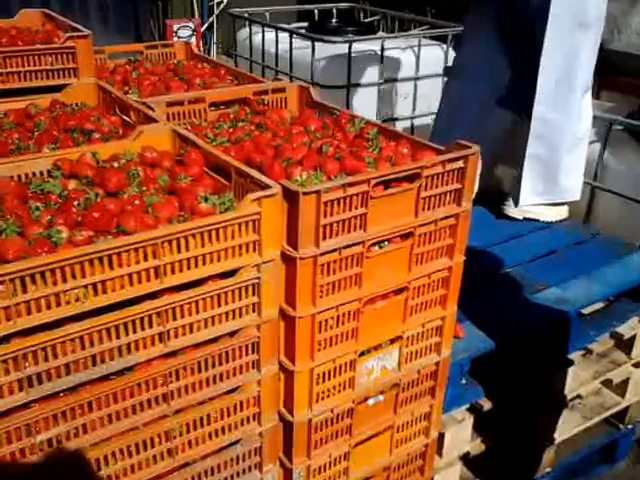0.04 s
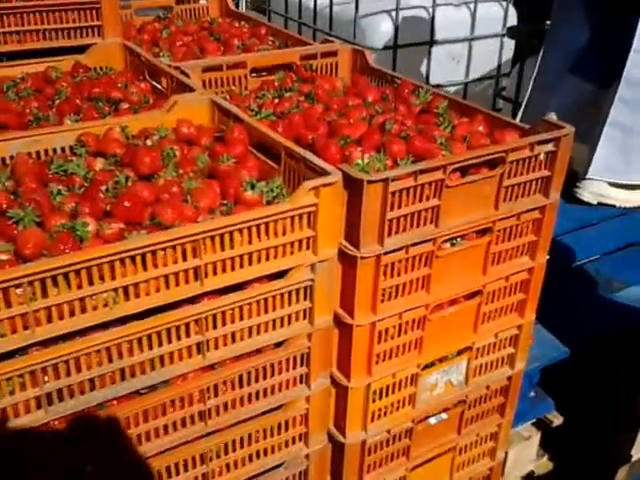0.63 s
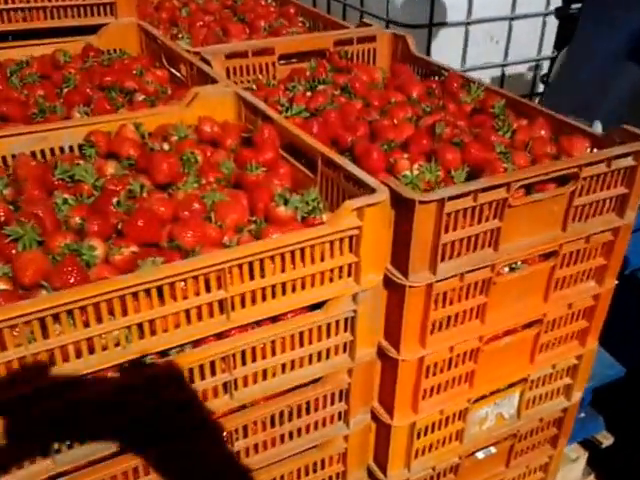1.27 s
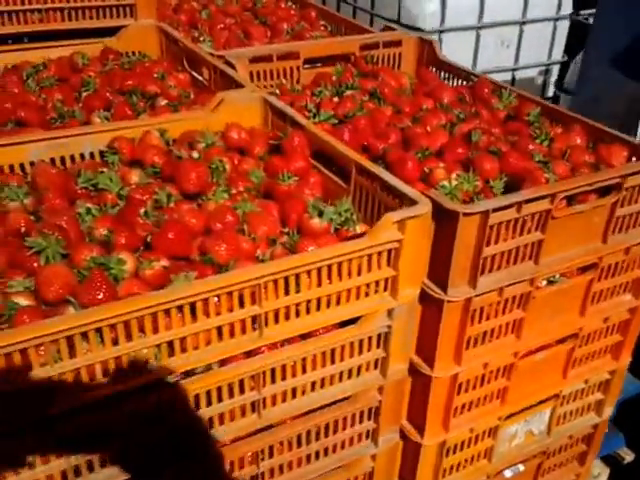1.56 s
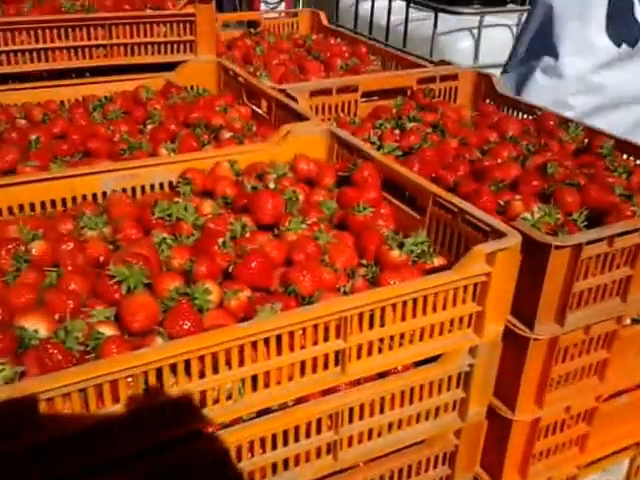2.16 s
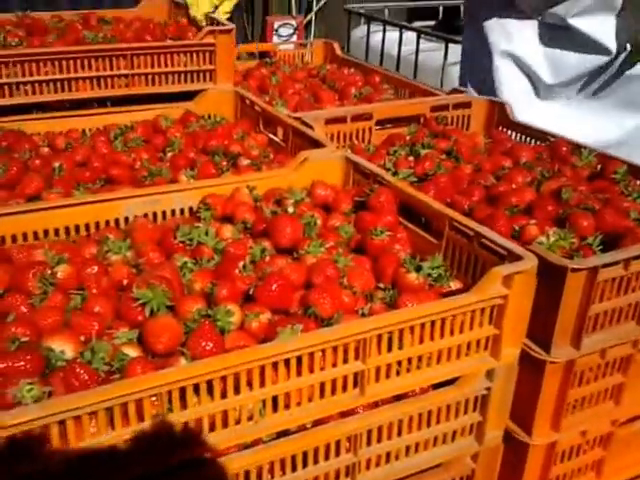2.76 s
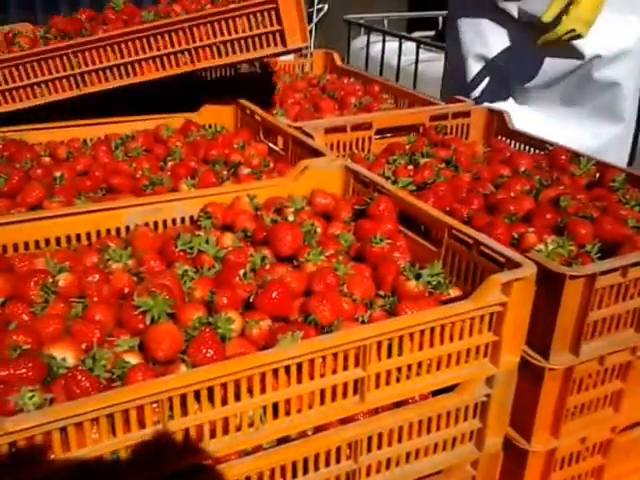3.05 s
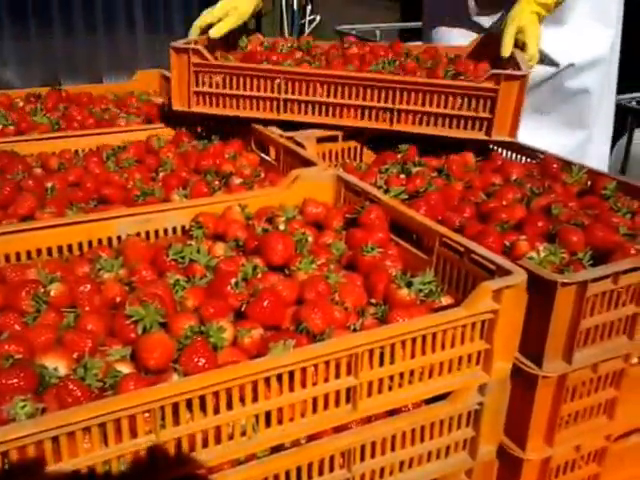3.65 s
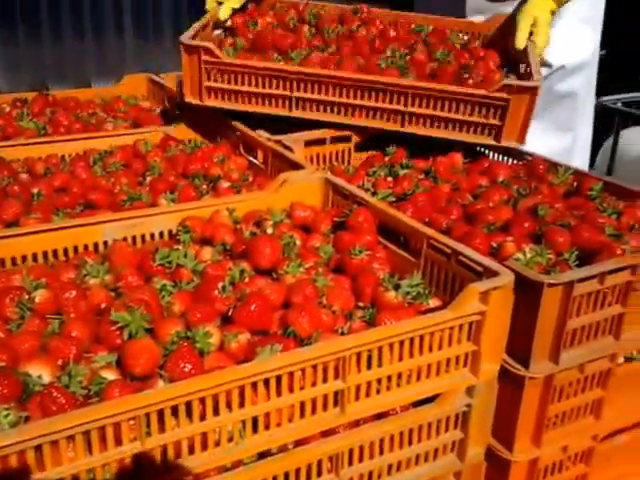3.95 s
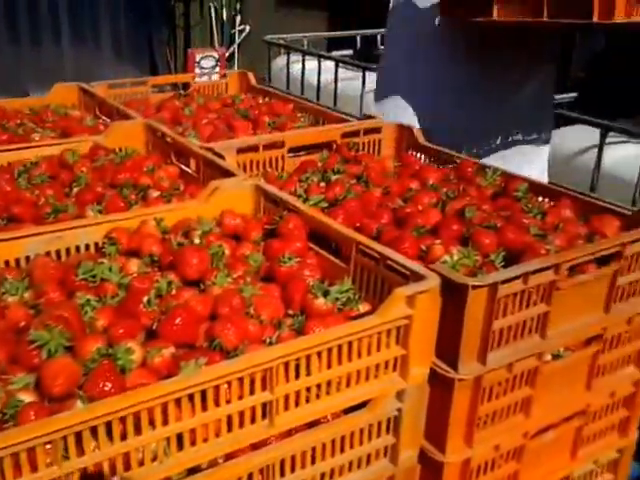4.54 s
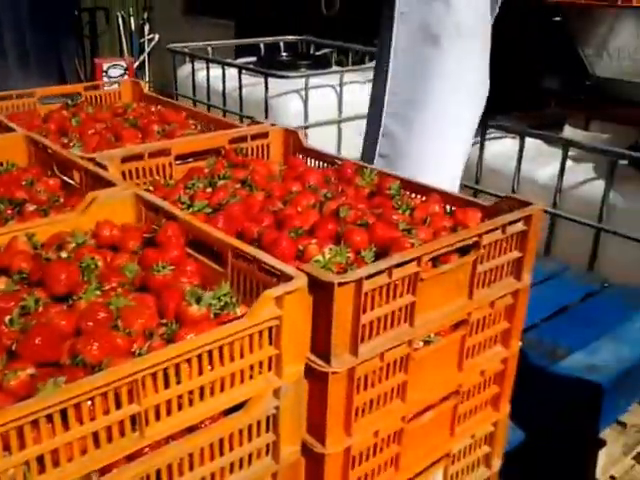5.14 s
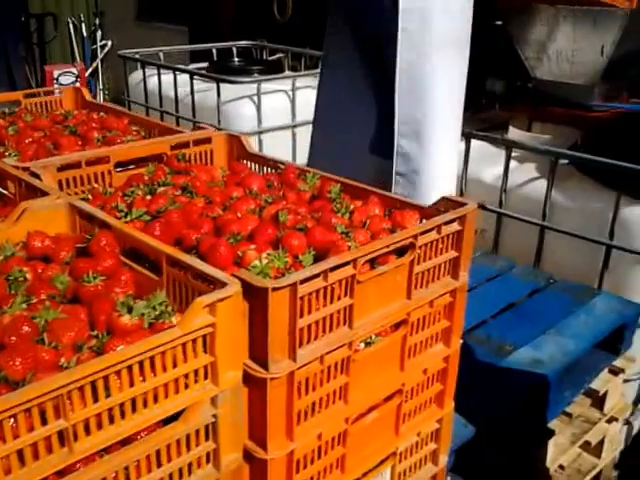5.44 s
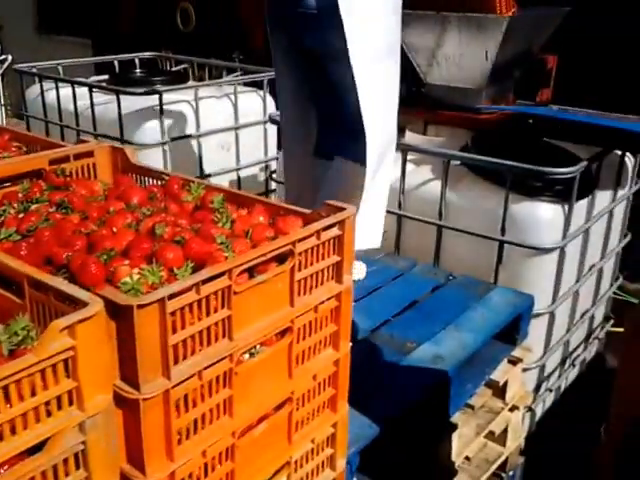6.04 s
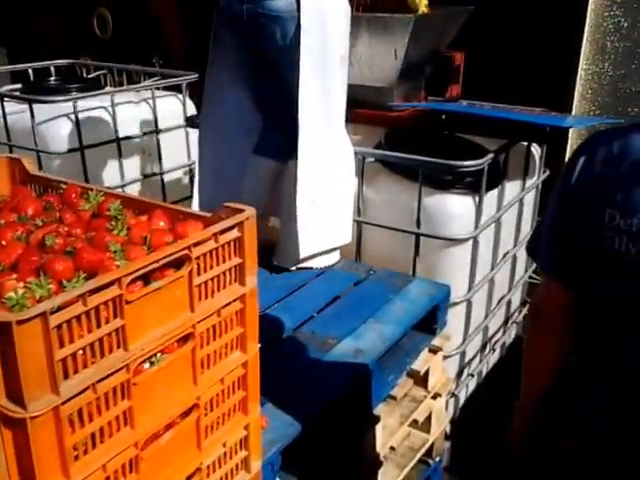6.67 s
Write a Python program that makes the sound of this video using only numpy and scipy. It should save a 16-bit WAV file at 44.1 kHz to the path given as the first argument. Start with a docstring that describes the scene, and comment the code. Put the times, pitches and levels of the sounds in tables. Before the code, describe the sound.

Loose steel parts clack rapidly over a running machine's hum and churn, with one short crate squeak and occasional plastic knocks.

```python
"""A yard: a fruit processing machine runs beside stacks of plastic crates full of strawberries.
Its motor hums, and a crank shakes the steel works about seven times a second: loose parts clack in the
same order on every turn and ring brightly over a steady churning. Crates are slid and knocked;
the hardest blows overload the microphone."""
import sys
import numpy as np
from scipy import signal
from scipy.fft import rfft, irfft
from scipy.io import wavfile

SR = 44100
rng = np.random.default_rng(int(sys.argv[2]) if len(sys.argv) > 2 else 0)


def dump_mix(stems):
    """Bounce the given channels to the path in sys.argv[1] as a 16-bit WAV at rate SR."""
    frames = np.atleast_2d(stems).T  # one column per channel
    limited = np.clip(frames, -1, 1)  # hard clip at full scale
    pcm = np.round(limited * 32767).astype(np.int16)
    wavfile.write(sys.argv[1], SR, pcm)


N = 304290
TIME = np.arange(N) / SR
START_S, CRANK_HZ, HUM_HZ, BODY_DB = .736, 7.233, 99.9, -15.5
TURN_STARTS_S = np.arange(0, N / SR, 1 / CRANK_HZ)

# Table levels are relative unless marked rms.
# motor hum: (time [s], level [dB])
HUM_LEVEL = [(.74, -22.5), (1.7, -17), (4.0, -17.5), (6.4, -16), (6.9, -20.5)]
# frame shake: (multiple of crank rate [-], rms level [dB])
FRAME_HARMONICS = [(8, -40), (9, -38), (10, -47), (11, -36), (12, -35), (13, -34), (15, -37.5), (16, -53),
                   (17, -40)]
# machine as the microphone moves round it: (time [s], clatter [dB], ring [dB], stroke ring [dB])
MACHINE_LEVELS = [(.76, -23, -22, -13.5), (1.8, -20, -21, -14), (2.9, -20, -22, -20),
                  (3.8, -19.5, -20.5, -11), (4.65, -21, -22.5, -30), (5.05, -21.5, -18.7, -6),
                  (5.6, -22, -15, -10), (6.45, -26.5, -16.5, -8), (6.88, -29.5, -18.5, -11)]
# hollow churning from the open front: (time [s], level [dB])
HOLLOW_LEVEL = [(.76, -33.5), (4.6, -38), (5.4, -35), (6.0, -27), (6.9, -26.5)]
# bright ring, lower from the open front: (time [s], centre [Hz])
RING_PITCH = [(.76, 6036), (4.7, 5920), (6.88, 5680)]
# contacts in one crank turn: (delay [s], steel body [dB], clatter [dB], ring [dB])
TURN_CONTACTS = [(0, -0.5, 1, 0.5), (.015, -3, -17.5, -5), (.033, -5, 4.5, -8.5), (.054, -3.5, 2, -17),
                 (.064, 1, 4, -4), (.078, -6.5, -10.5, -11), (.0938, 0, 1, 2), (.108, -9, 1, -10.5),
                 (.1265, -5.5, 6.5, -7.5)]
# steel panel resonances: (frequency [Hz], width [Hz], lift [dB])
PANEL_MODES = [(312.8, 6.1, 7.5), (417.5, 12, 5.5), (630, 34, 5.5), (1464, 63, 2), (1990, 38, 4.5),
               (2170, 49, 4), (2528, 47, 6.5), (3856, 45, 3.5)]
# loose part landing and rebounding each turn: (delay [s], low modes [dB], ring [dB])
STROKE_CLACKS = [(.0935, -0.5, -2.5), (.132, -9.5, -11.5)]
# occasional extra-hard clacks, many on a turn's rebound: (time [s], low modes [dB], ring [dB])
HARD_CLACKS = [(.8293, -25, -16), (0.997, -12, -18), (1.2968, -8.5, -18), (2.1227, -9.5, -13),
               (2.8959, -11, -11), (3.6115, -22, -7.5), (3.7257, -10, -17), (4.7584, -8, -18),
               (5.657, -10, -4), (6.074, -14.5, -5), (6.3518, -10.5, -13.5), (6.491, -12, -9.5)]
# low modes of loose parts: (frequency [Hz], level [dB], t60 [s])
LOW_MODES = [(1462, -10, .11), (1975, -9, .10), (2070, -11, .08), (2510, -14, .10), (3890, -16, .07)]
# crate knocks: (time [s], thud [dB], snap [dB], t60 [s])
CRATE_KNOCKS = [(1.009, -19, -18, 0.16), (3.0712, -10, -9, 0.04), (3.0777, -6, -13, 0.049),
                (3.0935, -28, -1, 0.029), (3.0955, -6.5, -2, 0.045), (3.103, -9.5, -14, 0.13),
                (5.23, -11, -7, 0.041), (5.241, -12, -4, 0.062), (5.252, -18, -16, 0.21)]
# sliding crate: (time [s], level [dB], squeak fundamental [Hz])
CRATE_SLIDE = [(1.03, -42, 528), (1.058, -25, 510), (1.10, -17.5, 432), (1.135, -19, 385),
               (1.155, -23, 380), (1.18, -55, 360)]
# noise spectra of the machine, then of the crates: (frequency [Hz], density [dB])
RUMBLE_SPECTRUM = [(20, -37.5), (40, -16.5), (54, 2.5), (85, -4), (120, 1), (145, -3), (220, -27.5),
                   (500, -51)]
CHURN_SPECTRUM = [(90, -16), (150, -3), (200, 3.5), (235, -1), (275, 5), (350, -4), (600, -2), (850, -5.5),
                  (1200, -9), (2300, -6), (2900, -18), (4500, -23)]
HOLLOW_SPECTRUM = [(600, -12), (800, 5.5), (1100, 4), (1400, 10.5), (1700, -10)]
STEEL_SPECTRUM = [(150, -13), (400, 1.5), (900, -6.5), (1500, 2), (2300, -1), (2900, -3), (4500, -17),
                  (8000, -40.5)]
CLATTER_SPECTRUM = [(1500, -33), (2500, 0), (3100, 5.5), (3900, 5), (4600, -0.5), (5500, -1), (7000, -8.5),
                    (8000, -79.5)]
THUD_SPECTRUM = [(80, -8.5), (240, -16.5), (350, 2), (560, -1), (800, -7), (1000, 1.5), (1400, -21),
                 (2500, -22), (5000, -50)]
SNAP_SPECTRUM = [(700, -8.5), (1800, -7.5), (3000, -5.5), (4400, -8), (5300, -1.5), (6300, -0.5),
                 (7000, -9), (8000, -19)]


def from_db(db):
    """Decibels to gain."""
    return 10 ** (np.asarray(db) / 20)


def unit_rms(x):
    """Scale to rms 1."""
    return x / np.sqrt(np.mean(x ** 2) + 1e-20)


def curves(rows):
    """Columns after time, interpolated per sample."""
    times_s, *columns = np.transpose(rows)
    return [np.interp(TIME, times_s, column) for column in columns]


def drift(cutoff_hz):
    """Slow random wander; rms 1."""
    slow = signal.sosfilt(signal.butter(2, cutoff_hz, fs=SR, output="sos"), rng.standard_normal(N + SR))
    return unit_rms(slow[SR:])


def coloured(x, spectrum):
    """Minimum-phase filter, 24 dB/octave skirts; white noise keeps its power."""
    taps = 8192
    hz, level_db = np.transpose(spectrum)
    grid_hz = np.maximum(np.fft.rfftfreq(taps, 1 / SR), 1)
    outside_oct = np.log2(np.maximum(np.maximum(grid_hz / hz[-1], hz[0] / grid_hz), 1))
    gain = unit_rms(from_db(np.interp(np.log(grid_hz), np.log(hz), level_db) - 24 * outside_oct))
    cepstrum = irfft(np.log(gain))[:taps // 2]
    cepstrum[1:] *= 2
    impulse_response = irfft(np.exp(rfft(cepstrum, taps)))
    return signal.fftconvolve(x, impulse_response)[:N]


def resonance(x, centre_hz, width_hz):
    """Band-pass with a per-sample centre; rms 1."""
    carrier = np.exp(2j * np.pi * np.cumsum(centre_hz) / SR)
    baseband = signal.sosfilt(signal.butter(2, width_hz / 2, fs=SR, output="sos"), x / carrier)
    return unit_rms((baseband * carrier).real)


def grains(per_s, spread_db):
    """Dense tiny impacts at random times; rms 1."""
    sizes = from_db(spread_db * np.minimum(rng.exponential(1, N), 4)) * rng.choice([-1, 1], N)
    return unit_rms(sizes * (rng.random(N) < per_s / SR))


def blow_power(blows, rise_s):
    """Summed power envelopes of independent blows: (time [s], level [dB], t60 [s])."""
    power, age_s = np.zeros(N + SR), TIME[:SR // 3]
    for time_s, level_db, t60_s in blows:
        start = int(np.clip(time_s * SR, 0, N))
        envelope = from_db(level_db - 60 * age_s / t60_s) * (1 - np.exp(-age_s / rise_s))
        power[start:start + len(age_s)] += envelope ** 2
    return power[:N]


def ping(hz, t60_s, age_s):
    """One struck mode; rms 1 at onset."""
    return np.sqrt(2) * np.sin(2 * np.pi * (hz * age_s + rng.random())) * from_db(-60 * age_s / t60_s)


def motor(octave_db, rumble_db):
    """Magnetic hum at twice the mains rate; the frame shakes at crank harmonics and rumbles."""
    hum_db, = curves(HUM_LEVEL)
    phase_rad = 2 * np.pi * HUM_HZ * TIME + .07 * drift(2.4)
    hum = from_db(hum_db - 2) * (np.sin(phase_rad) + from_db(octave_db) * np.sin(2 * phase_rad))
    turns = CRANK_HZ * TIME + .0025 * drift(.92)
    shake = sum(from_db(db) * np.sin(2 * np.pi * (k * turns + rng.random())) for k, db in FRAME_HARMONICS)
    rumble = from_db(rumble_db) * coloured(rng.standard_normal(N), RUMBLE_SPECTRUM)
    return np.sqrt(2) * (hum + shake) + rumble


def crank_chatter(jitter_s, uneven_db, t60_s):
    """Contacts repeat each turn, never quite alike; body, clatter and ring power, each of mean 1."""
    delay_s, *levels_db = np.tile(TURN_CONTACTS, (len(TURN_STARTS_S), 1)).T
    late, hard, *scatters = rng.standard_normal((len(delay_s), 5)).T
    times_s = np.repeat(TURN_STARTS_S, len(TURN_CONTACTS)) + delay_s + jitter_s * late
    powers = []
    for level_db, scatter in zip(levels_db, scatters):
        struck_db = level_db + uneven_db * (hard + .5 * scatter)
        power = blow_power([(s, db, t60_s) for s, db in zip(times_s, struck_db)], rise_s=.00067)
        powers.append(power / power.mean())
    return powers


def churning(body_power):
    """Steady grainy churn, plus a hollow band from the open front that pulses with the crank."""
    hollow_db, = curves(HOLLOW_LEVEL)
    churn = coloured(grains(per_s=12000, spread_db=1.7), CHURN_SPECTRUM)
    churn_gain = from_db(BODY_DB - 6.5 + drift(17.6))
    hollow = coloured(rng.standard_normal(N), HOLLOW_SPECTRUM)
    hollow_gain = from_db(hollow_db) * np.sqrt(.5 * body_power + .5)
    return churn_gain * churn + hollow_gain * hollow


def steel_rattle(body_power, clatter_power, clacks):
    """Contacts and landing parts excite the steel body and a higher clatter."""
    clatter_db, _, _ = curves(MACHINE_LEVELS)
    clack_power = blow_power([(s, db - BODY_DB, .04) for s, db, _ in clacks], rise_s=.0006)
    body_force = from_db(BODY_DB - 9) * np.sqrt(body_power + .6 * clack_power)
    body = coloured(body_force * grains(per_s=9000, spread_db=3.8), STEEL_SPECTRUM)
    clatter_force = from_db(clatter_db - 5.5) * np.sqrt(clatter_power + .5 + 5.2 * clack_power)
    clatter = coloured(clatter_force * grains(per_s=11000, spread_db=2), CLATTER_SPECTRUM)
    return body + clatter


def panels(x):
    """Steel panels ring on at their own pitches."""
    for hz, width_hz, lift_db in PANEL_MODES:
        band = signal.lfilter(*signal.iirpeak(hz, hz / width_hz, fs=SR), x)
        x = x + (from_db(lift_db) - 1) * band
    return x


def bright_ring(ring_power):
    """Chatter drives a broad, quickly damped resonance and a narrower one on its upper flank."""
    _, ring_db, _ = curves(MACHINE_LEVELS)
    ring_hz, = curves(RING_PITCH)
    broad = resonance(grains(per_s=5600, spread_db=0), ring_hz + 40, width_hz=950)
    upper = resonance(grains(per_s=6600, spread_db=-1.5), np.full(N, 6480), width_hz=760)
    return from_db(ring_db - 3) * np.sqrt(ring_power + .37) * (broad + from_db(-8.5) * upper)


def landings(jitter_s, uneven_db):
    """Each turn's landings plus occasional extra-hard clacks: (time [s], low modes [dB], ring [dB])."""
    delay_s, low_db, ring_db = np.tile(STROKE_CLACKS, (len(TURN_STARTS_S), 1)).T
    late, hard, scatter = rng.standard_normal((len(delay_s), 3)).T
    times_s = np.repeat(TURN_STARTS_S, len(STROKE_CLACKS)) + delay_s + jitter_s * late
    _, _, stroke_db = curves(MACHINE_LEVELS)
    low_db = BODY_DB + 2 + low_db + uneven_db * hard
    ring_db = np.interp(times_s, TIME, stroke_db) + ring_db + uneven_db * (hard + scatter) / 2
    return np.vstack([np.transpose([times_s, low_db, ring_db]), HARD_CLACKS])


def loose_parts(clacks, ring_t60_s, rise_s, split_hz, scatter_hz):
    """A part lands hard: three close bright modes beat and die quickly; its low modes ring on."""
    out, age_s = np.zeros(N + SR), TIME[:SR // 6]
    attack = 1 - np.exp(-age_s / rise_s)
    for time_s, low_db, ring_db in clacks:
        centre_hz = np.interp(time_s, *np.transpose(RING_PITCH))
        modes_hz = centre_hz + split_hz * np.array([-1, 0, 1]) + scatter_hz * rng.standard_normal(3)
        ring = sum(gain * ping(hz, ring_t60_s, age_s) for hz, gain in zip(modes_hz, (.45, .75, .55)))
        low = sum(from_db(db) * ping(hz, t60_s, age_s) for hz, db, t60_s in LOW_MODES)
        start = int(time_s * SR)
        out[start:start + len(age_s)] += from_db(ring_db + 2.6) * ring * attack + from_db(low_db - 2.2) * low
    return out[:N]


def crate_knocks():
    """Plastic crates knock with a thud and a crunchy snap."""
    thud_power = blow_power([(s, db, t60_s) for s, db, _, t60_s in CRATE_KNOCKS], rise_s=.00029)
    snap_power = blow_power([(s, db, t60_s) for s, _, db, t60_s in CRATE_KNOCKS], rise_s=.00024)
    thuds = coloured(np.sqrt(thud_power) * rng.standard_normal(N), THUD_SPECTRUM)
    snaps = coloured(np.sqrt(snap_power) * rng.standard_normal(N), SNAP_SPECTRUM)
    return thuds + snaps


def crate_slide():
    """Friction drives harmonics 2-5 of a rough, falling squeak."""
    level_db, squeak_hz = curves(CRATE_SLIDE)
    friction = grains(per_s=2000, spread_db=0)
    squeak = sum(resonance(friction, k * squeak_hz, width_hz=190) for k in range(2, 6))
    return from_db(level_db) * unit_rms(squeak)


def scene():
    """Machine and crates, mono."""
    clacks = landings(jitter_s=.0005, uneven_db=1)
    body_power, clatter_power, ring_power = crank_chatter(jitter_s=.0017, uneven_db=2.36, t60_s=.13)
    machine = motor(octave_db=-20.5, rumble_db=-29)
    machine += panels(churning(body_power) + steel_rattle(body_power, clatter_power, clacks))
    machine += bright_ring(ring_power)
    machine += loose_parts(clacks, ring_t60_s=.044, rise_s=.0012, split_hz=320, scatter_hz=120)
    return (machine + crate_knocks() + crate_slide())[None]


def record(dry):
    """A narrow-band microphone switches on at START_S; the loudest peaks clip."""
    band_edge_hz, rolloff_hz, output_cutoff_hz = 7750, 7200, 16000
    heard = dry * (TIME >= START_S)
    heard = signal.sosfilt(signal.ellip(8, .2, 70, band_edge_hz, fs=SR, output="sos"), heard)
    heard = signal.sosfilt(signal.butter(8, rolloff_hz, fs=SR, output="sos"), heard)
    clipped = np.clip(heard, -1, 1)
    return signal.sosfilt(signal.ellip(8, .2, 70, output_cutoff_hz, fs=SR, output="sos"), clipped)


dry = scene()
out = record(dry)
dump_mix(out)
```